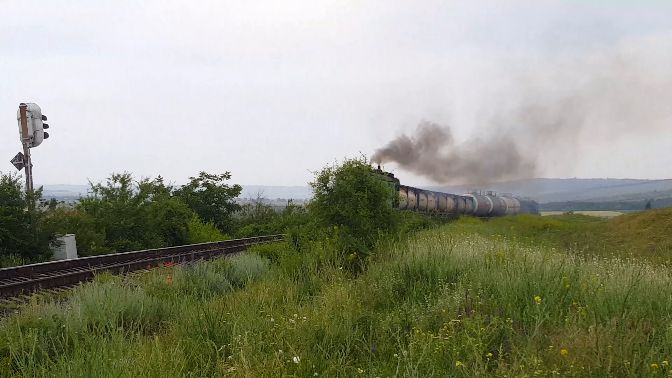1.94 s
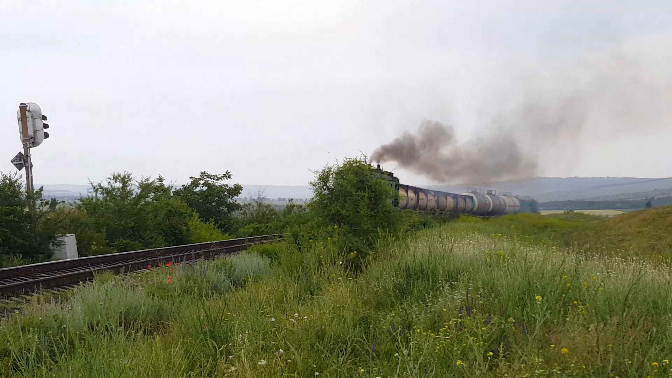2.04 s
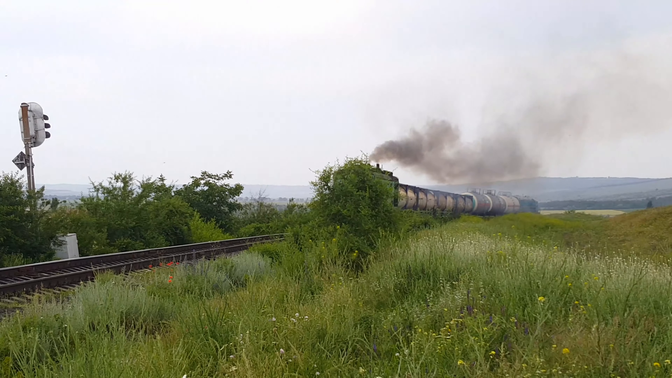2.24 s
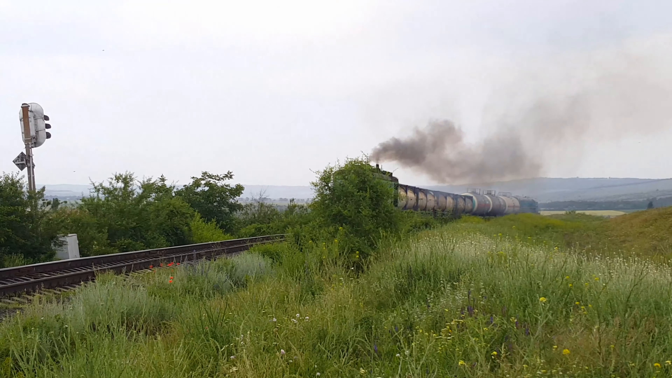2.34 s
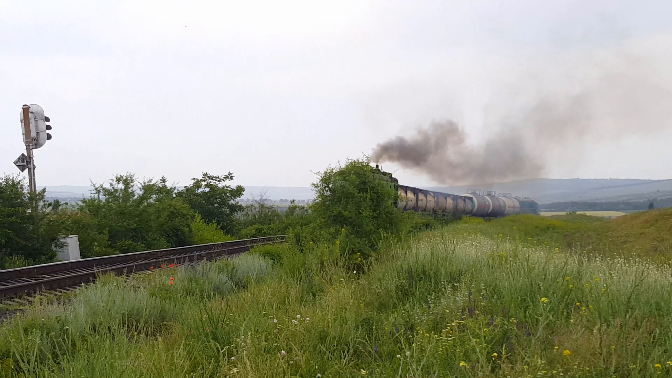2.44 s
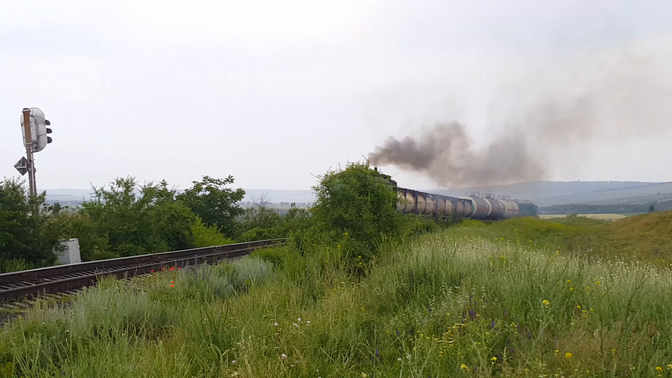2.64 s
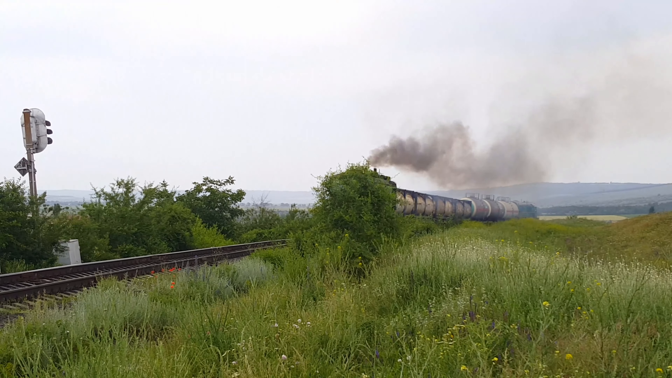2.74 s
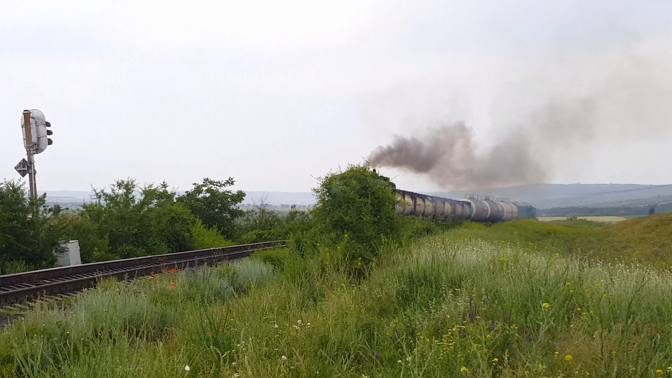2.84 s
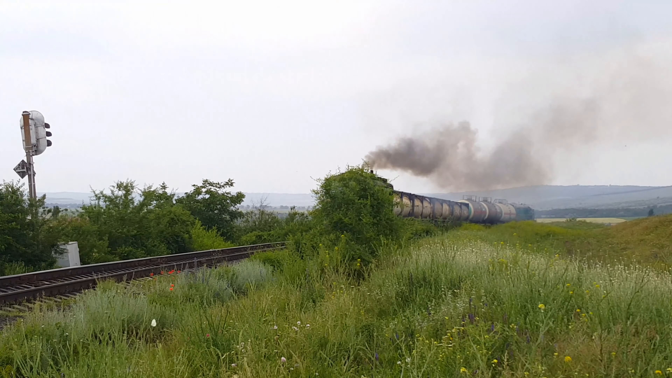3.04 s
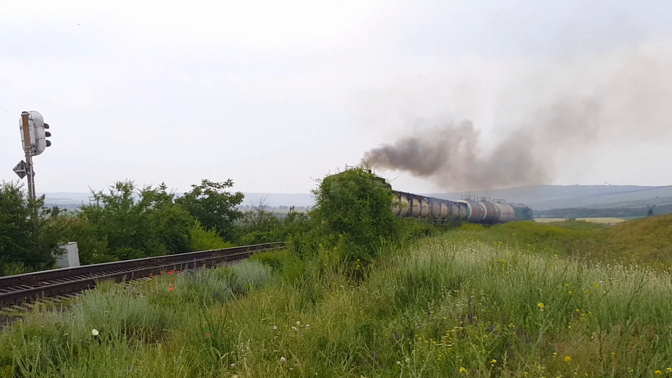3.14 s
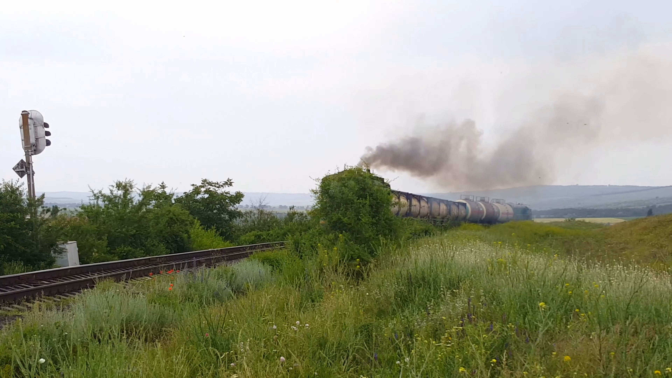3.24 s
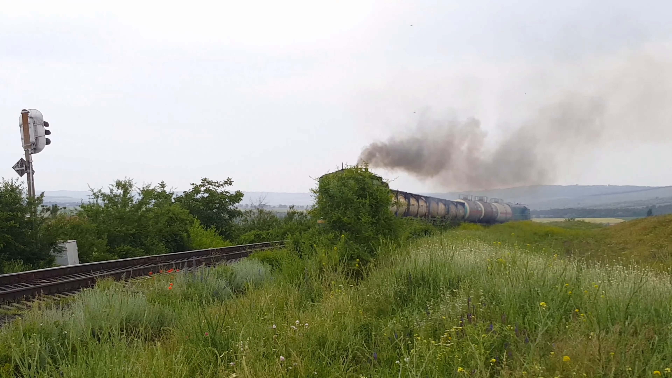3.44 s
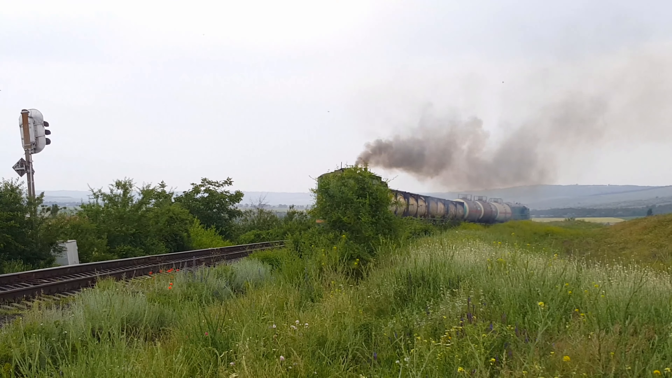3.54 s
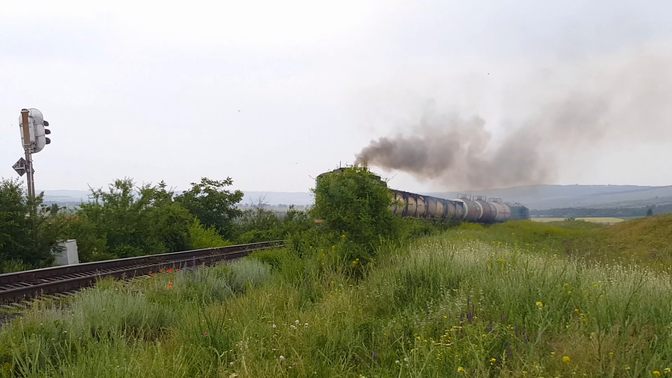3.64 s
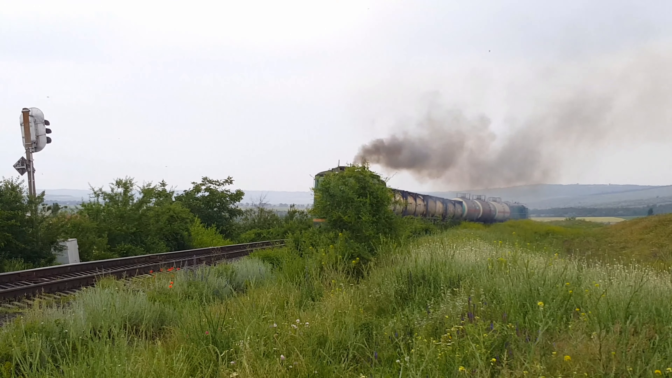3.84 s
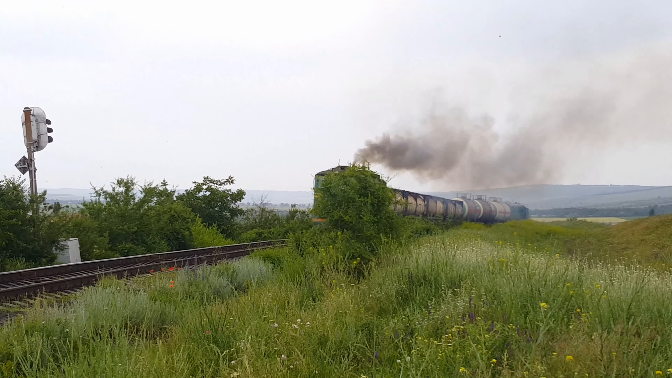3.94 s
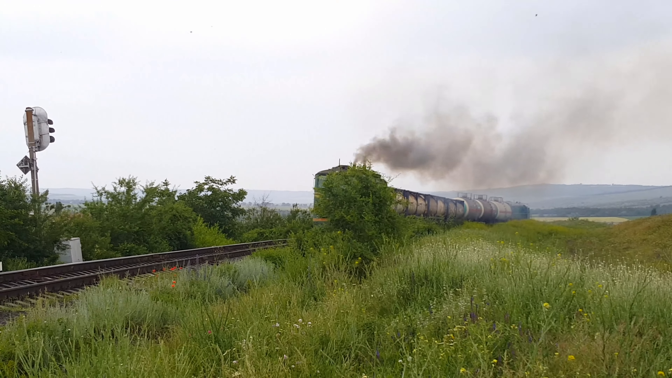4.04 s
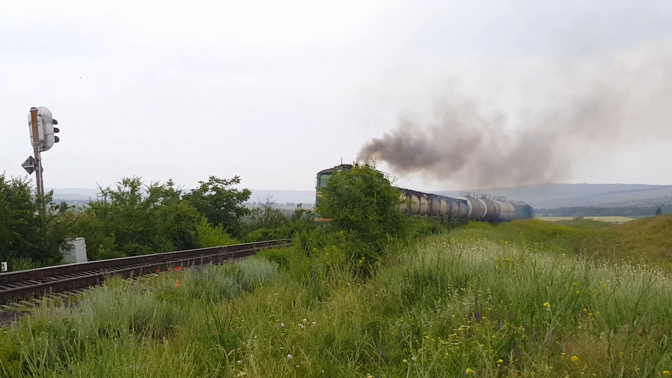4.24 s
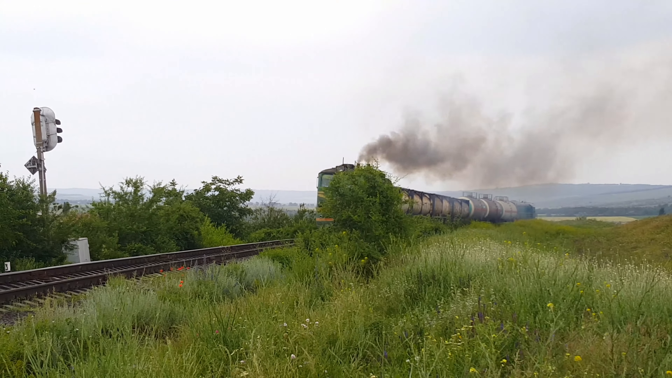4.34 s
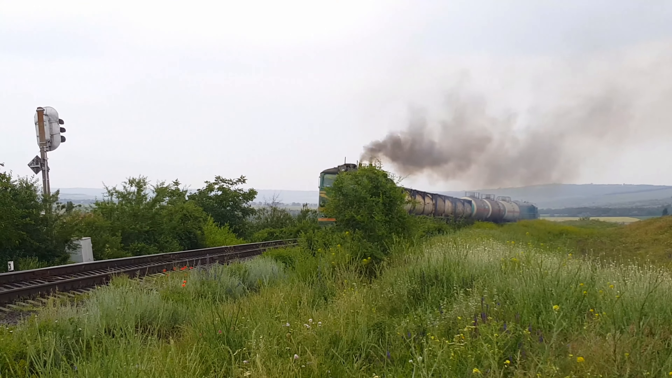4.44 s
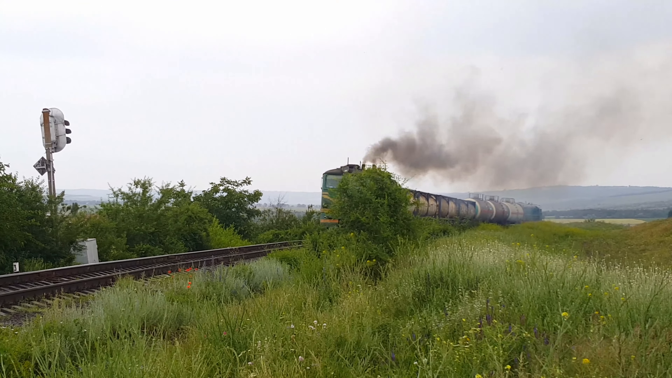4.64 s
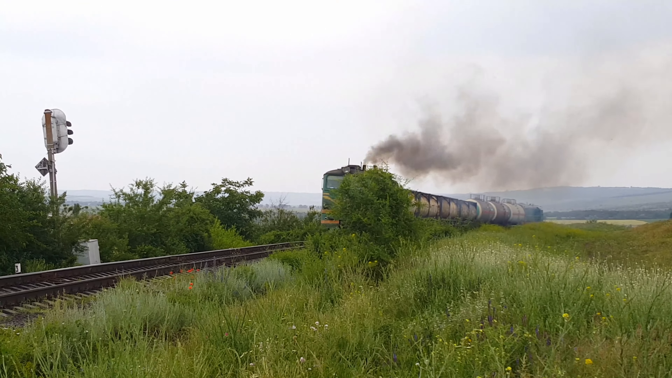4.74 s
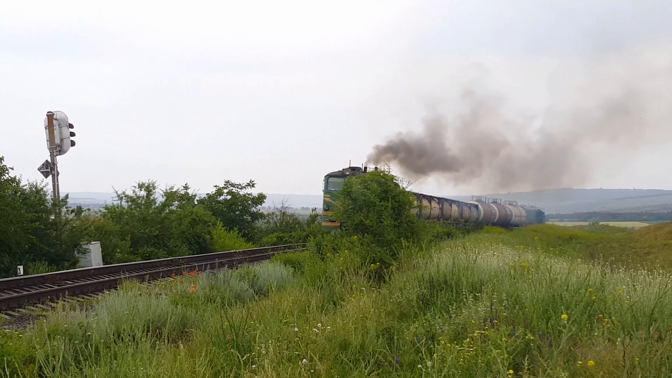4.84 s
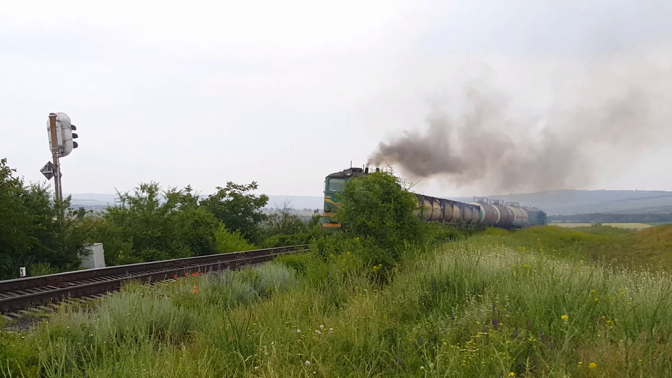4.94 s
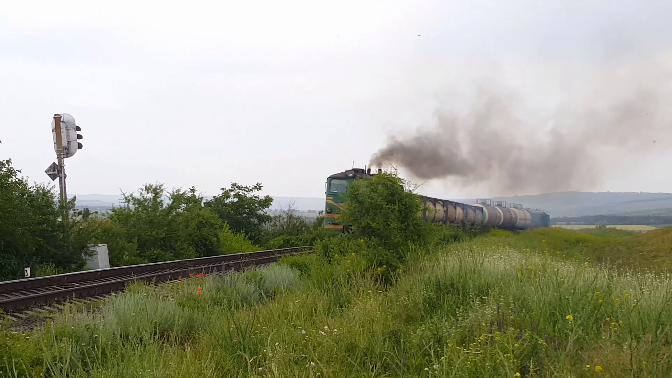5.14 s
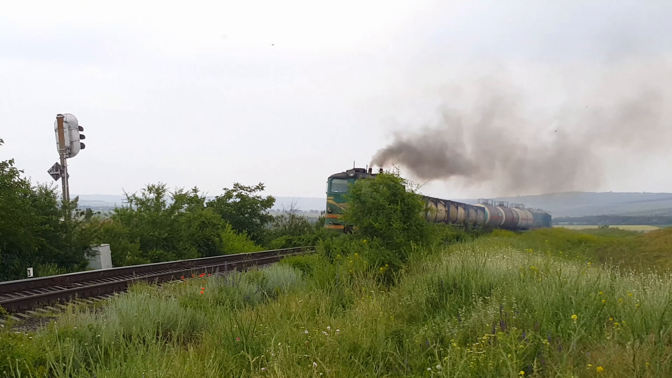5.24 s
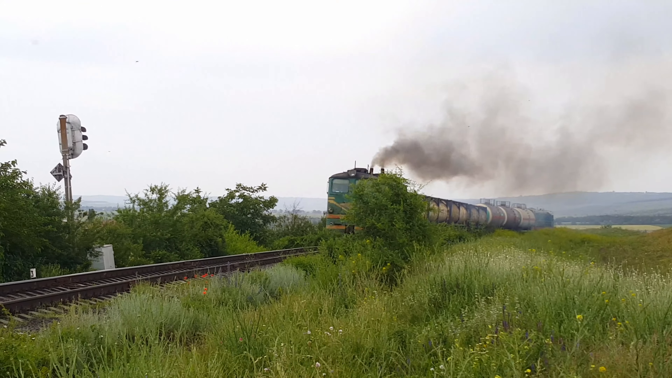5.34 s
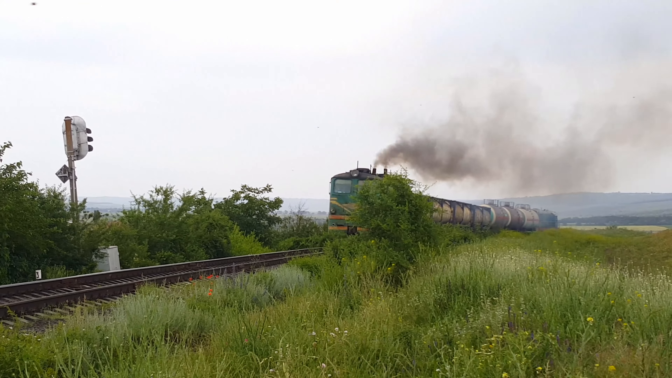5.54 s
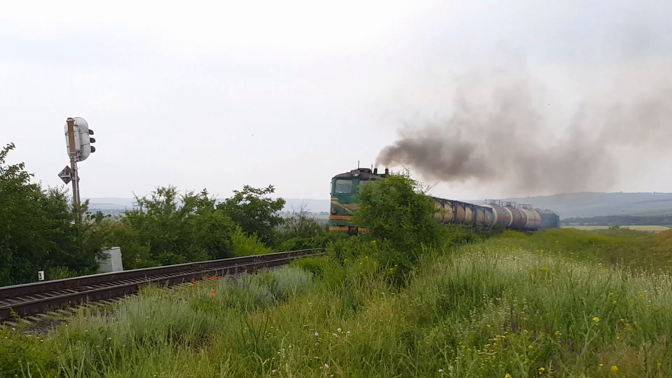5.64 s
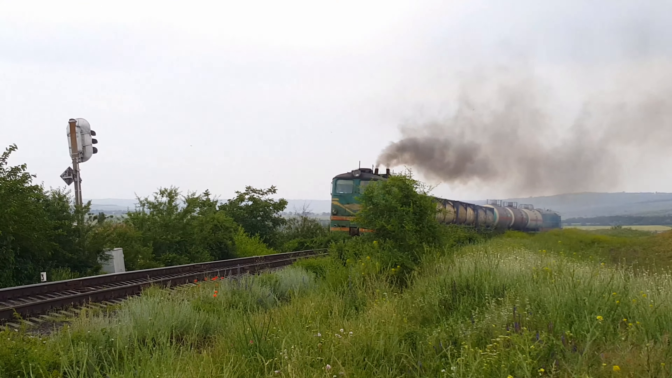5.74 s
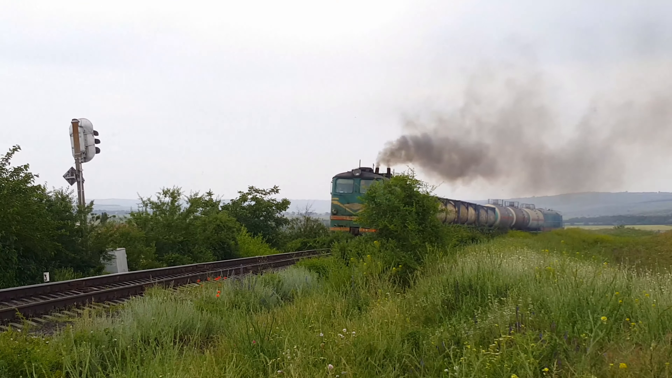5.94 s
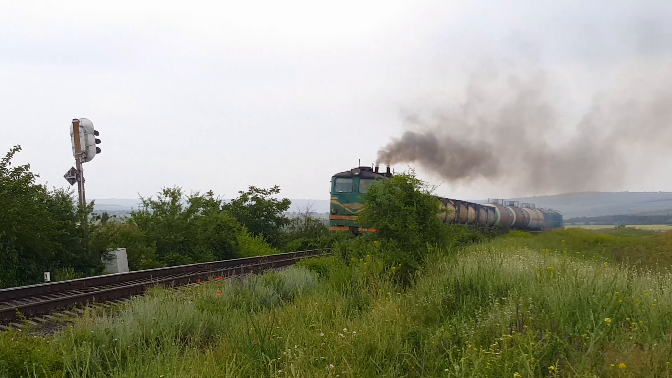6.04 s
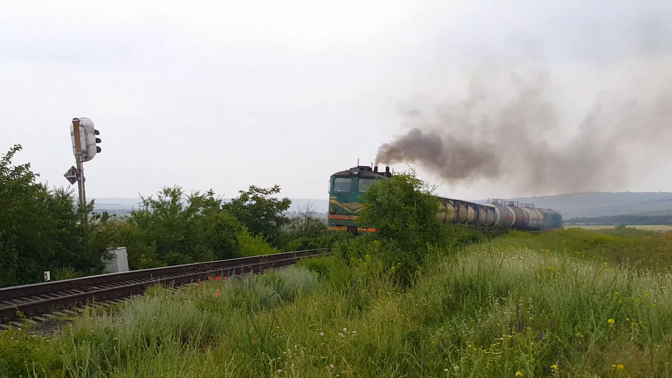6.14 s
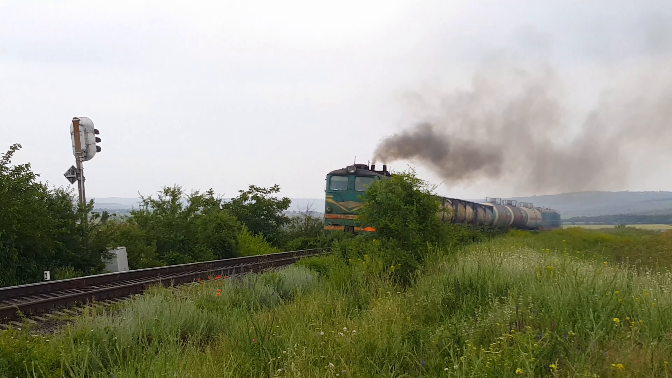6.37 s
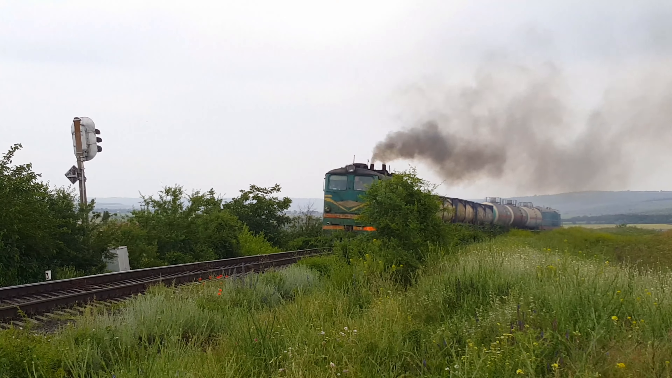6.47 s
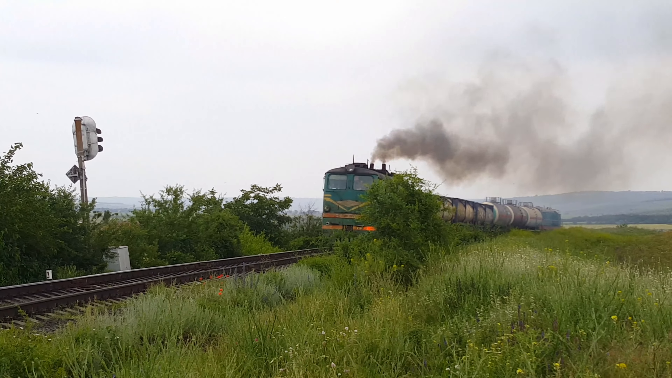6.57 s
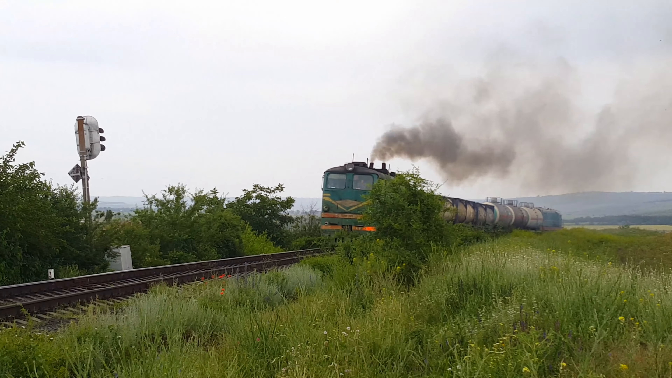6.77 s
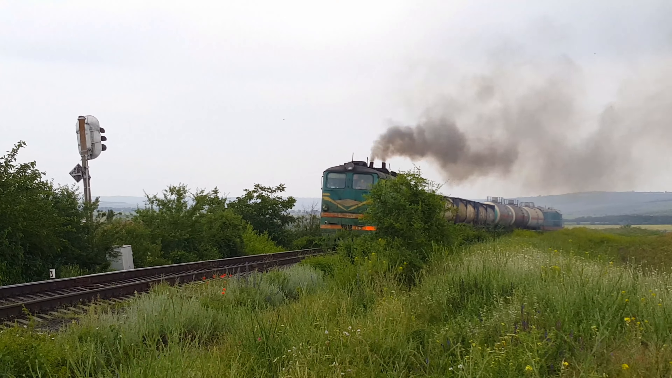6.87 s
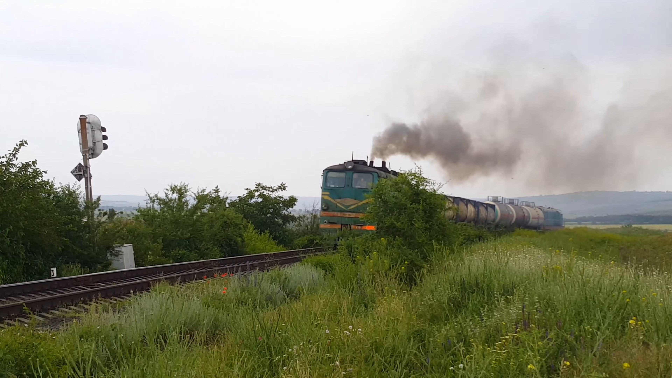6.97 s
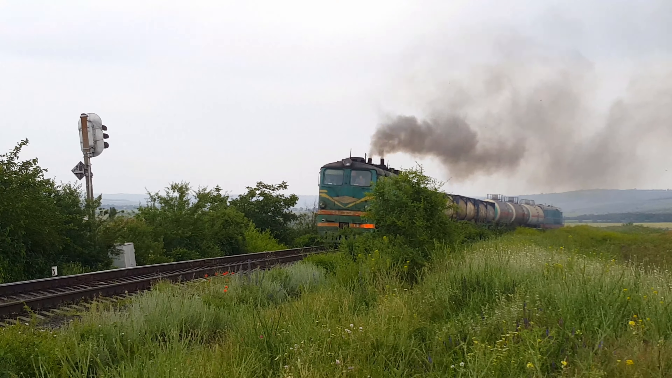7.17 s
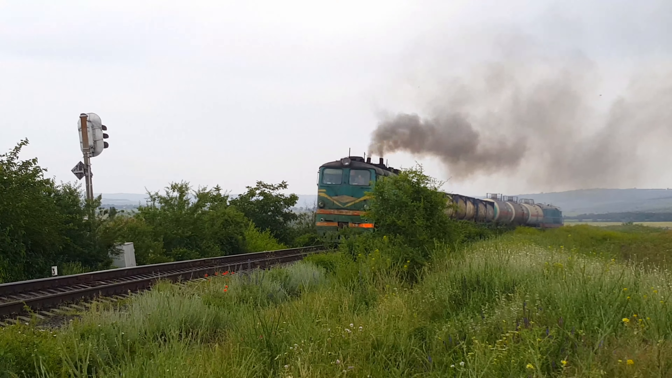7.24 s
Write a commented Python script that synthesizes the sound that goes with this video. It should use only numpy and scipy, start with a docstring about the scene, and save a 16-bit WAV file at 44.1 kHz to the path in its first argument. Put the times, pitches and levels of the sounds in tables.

```python
"""Diesel freight train on a grade

A heavy locomotive hauls tank wagons uphill, slowly nearing across open grassland. Its exhaust throbs
at harmonics of the crank rate and excites the resonances of the stack; the valve gear clatters and the
turbocharger whistles. Wheels rumble round a curve, where friction between flange and rail makes them
grind and squeal in bouts. Insects hiss faintly in the grass."""
import sys
import numpy as np
from scipy import signal
from scipy.fft import rfft, irfft, next_fast_len
from scipy.io import wavfile

SR = 44100
rng = np.random.default_rng(int(sys.argv[2]) if len(sys.argv) > 2 else 0)


def wav_record(signal):
    """Record a signal, one row per channel, as 16-bit PCM in the file named by sys.argv[1]."""
    frames = np.transpose(np.atleast_2d(signal))
    bounded = np.clip(frames, -1, 1)
    # unit amplitude maps onto the largest positive 16-bit level
    quanta = np.round(bounded * 32767).astype(np.int16)
    wavfile.write(sys.argv[1], SR, quanta)


N = 362061
T = np.arange(N) / SR


def gain_of(db):
    """Amplitude ratio of a level in decibels."""
    return 10 ** (np.asarray(db) / 20)


def unit_rms(x):
    """Normalisation to an rms of 1."""
    return x / np.sqrt(np.mean(x ** 2) + 1e-20)


def follow(curve):
    """Linear interpolation of a (time, value) table at every sample."""
    return np.interp(T, *np.transpose(curve))


def at_hz(spectrum, hz):
    """Interpolation of a (frequency, value) table on a logarithmic frequency axis."""
    freqs, values = np.transpose(spectrum)
    return np.interp(np.log(hz + 1), np.log(freqs + 1), values)


def drift(top_hz):
    """Slow random fluctuation of rms 1: sinusoids of random phase over three octaves."""
    times = np.linspace(0, T[-1], 4000)
    rates, phases = np.geomspace(top_hz / 8, top_hz, 30), rng.random(30)
    waves = np.sin(2 * np.pi * (np.outer(times, rates) + phases))
    return unit_rms(np.interp(T, times, waves @ rates ** -.5))


def filtered(x, response):
    """Linear filtering: the spectrum is multiplied by a frequency response."""
    size = next_fast_len(N + 8192)
    return irfft(rfft(x, size) * response(np.fft.rfftfreq(size, 1 / SR)), size)[..., :N]


def resonate(x, modes):
    """Modal superposition: each (frequency, width, gain) mode is two like resonators in cascade."""
    return filtered(x, lambda hz: sum(gain_of(db) / (1 + 2j * (hz - centre) / width) ** 2
                                      for centre, width, db in modes))


def unit_in_band(x, low_hz, high_hz):
    """Normalisation so that the mean of the channels has an rms of 1 within a band."""
    mono = np.atleast_2d(x).mean(0)
    return x / np.std(filtered(mono, lambda hz: (hz > low_hz) & (hz < high_hz)))


# Likeness of the sound field at left and right: (frequency [Hz], coherence [0-1])
COHERENCE = [(60, 1), (120, 0.96), (240, 0.97), (480, 0.99), (950, 0.73), (1890, 0.84), (3770, 0.69),
             (7520, 0.43), (15000, 0.08)]

def white_pair():
    """Partial coherence: white noise in two channels, less alike towards the treble."""
    mid, side = rng.standard_normal((2, N))
    mid = filtered(mid, lambda hz: np.sqrt(1 + at_hz(COHERENCE, hz)))
    side = filtered(side, lambda hz: np.sqrt(1 - at_hz(COHERENCE, hz)))
    return np.array([mid + side, mid - side])


def noise(spectrum):
    """Spectral shaping of two-channel white noise."""
    return filtered(white_pair(), lambda hz: gain_of(at_hz(spectrum, hz)))


def whine(pitch_hz, level_db, wander_hz, flutter_db):
    """Random modulation: moving air on the path makes a pure tone waver in pitch and level."""
    phase = 2 * np.pi * np.cumsum(pitch_hz + wander_hz * drift(40)) / SR
    return np.sqrt(2) * np.sin(phase) * gain_of(level_db + flutter_db * drift(15))


def nearness(power=1, start_m=131.6, approach_m_per_s=7.68):
    """Inverse-distance law, raised to a power: the gain of the nearing train, 1 at the start."""
    return (start_m / (start_m - approach_m_per_s * T)) ** power


def fan(crank_hz, order=49):
    """Rotational tone: the fan whines at a fixed multiple of the crank rate."""
    return whine(order * crank_hz, level_db=-44.5, wander_hz=.49, flutter_db=-.4) * nearness(power=.75)


# Harmonics of the exhaust: (order [multiple of the crank rate], relative level [dB])
EXHAUST_ORDERS = [(5, -47), (6, -39), (7, -18), (8, -36), (9, -29), (10, -25), (11, -40), (12, -30),
                  (13, -18), (14, -32), (15, -36), (16, -26), (17, -33), (18, -35), (19, -40), (20, -39),
                  (21, -46), (22, -43), (23, -51), (24, -32), (25, -37), (26, -40), (27, -40), (28, -38),
                  (29, -40), (30, -60), (31, -52), (32, -47), (33, -49), (34, -55)]
# Strength of the upper orders together: (time [s], level [dB])
BARK_LEVEL = [(0.5, -27.5), (2.6, -30), (5.5, -28.3), (8.21, -26.5)]

def exhaust(turns, boom_db=-16.5, shudder_db=.5, first_bark_order=22):
    """Dispersion: the pipe delays each order differently, smearing each blast into a boom and a bark."""
    boom_pipe, bark_pipe = (.656, -.024, .014), (.719, -.112, 0)  # delay, quadratic, cubic phase terms
    wavering_turns = turns + .0006 * drift(6)  # unsteady gas flow
    boom, bark = np.zeros((2, N))
    for order, db in EXHAUST_ORDERS:
        layer, (delay, quadratic, cubic) = (boom, boom_pipe) if order < first_bark_order else (bark, bark_pipe)
        offset = order - 13
        cycles = order * (wavering_turns - delay) + quadratic * offset ** 2 + cubic * offset ** 3
        layer += gain_of(db + .45 * drift(5)) * np.cos(2 * np.pi * cycles)
    boom_gain = gain_of(boom_db + shudder_db * drift(12)) * nearness()
    return boom_gain * unit_rms(boom) + gain_of(follow(BARK_LEVEL)) * unit_rms(bark)


# Turbulent exhaust gas: (frequency [Hz], relative spectral density [dB])
GAS_SPECTRUM = [(20, -23), (35, -11.5), (55, 11.5), (80, 3.5), (120, 8.5), (170, 1), (250, -1.5),
                (350, -13.5), (600, -51)]

def exhaust_gas(level_db=-32):
    """Turbulence: the outflow makes a low rumble that grows as the engine nears."""
    return gain_of(level_db) * nearness() * unit_rms(noise(GAS_SPECTRUM))


# Hardest exhaust blows of each crank turn: (position [turns], relative level [dB])
BLOWS = [(.27, -1), (.385, -11), (.6, -14), (.79, -12), (.95, 0)]
# Resonances of the stack: (frequency [Hz], width [Hz], gain [dB])
STACK_MODES = [(955, 75, 0), (900, 110, -6)]
# Bands of the gas rasp after each blow: (frequency [Hz], width [Hz], gain [dB])
RASP_BANDS = [(760, 250, 0.5), (1828, 210, -4)]
# Strength of the stack's ringing: (time [s], level [dB])
KNOCK_LEVEL = [(0, -38.5), (4, -39), (6.3, -36), (7.2, -42), (8.21, -41)]

def stack(turns, rasp_db=-48.5, rasp_decay_s=.024):
    """Impulse response: exhaust blows ring the stack in a double knock, each with a decaying rasp."""
    blows = np.zeros(N)
    for position, db in BLOWS:
        blows[1:] += gain_of(db) * np.diff(np.floor(turns - position))
    blows *= gain_of(.8 * drift(20))
    puffs = resonate(blows, [(935, 190, 0)])  # soft-edged puffs give round knocks
    knock = gain_of(follow(KNOCK_LEVEL)) * unit_rms(resonate(puffs, STACK_MODES))
    flow = signal.lfilter([1], [1, -np.exp(-1 / (SR * rasp_decay_s))], blows)
    rasp = resonate(flow * rng.standard_normal(N), RASP_BANDS)
    return knock + gain_of(rasp_db) * nearness(power=1.6) * unit_rms(rasp)


def throb(turns, depth):
    """Amplitude modulation at the exhaust's strong beat, seven to a crank turn."""
    return 1 + depth * np.cos(2 * np.pi * 7 * turns)


# Resonances of the engine casing: (frequency [Hz], width [Hz], gain [dB])
CASING_MODES = [(369.4, 24, -5.5), (423, 39, -12.5), (497, 135, -7), (654, 36, 0.5), (755, 21, 4.5),
                (1210, 180, -11)]
# Strength of both the valve rattle and the rolling roar: (time [s], relative level [dB])
ROAR_LEVEL = [(0.3, -38.5), (3, -36), (8.21, -34)]

def valve_gear(turns, level_db=-4, points_per_turn=4096):
    """Forced vibration: a dense rattle, repeating with every crank turn, drives the casing's modes."""
    one_turn = rng.standard_normal(points_per_turn)
    rattle = np.interp(turns % 1, np.arange(points_per_turn) / points_per_turn, one_turn)
    rattle *= throb(turns, depth=.2)
    return gain_of(follow(ROAR_LEVEL) + level_db) * unit_rms(resonate(rattle, CASING_MODES))


# Pitch of the turbocharger's main whistle: (time [s], frequency [Hz])
TURBO_PITCH = [(0, 2059), (2.5, 2060), (4.5, 2066), (6.5, 2073), (8.21, 2072)]
# Strength of its main and high tones: (time [s], relative level [dB])
WHISTLE_LEVEL = [(0, -53), (.7, -46.5), (1.1, -53), (2, -43), (2.8, -53), (5, -45), (5.4, -51.5), (7, -44),
                 (8.21, -51.5)]
# Strength of its low tone: (time [s], relative level [dB])
LOW_WHINE_LEVEL = [(0, -63), (1.2, -50), (2.5, -38), (3.75, -41.5), (5.3, -53.5), (6.4, -41), (8.21, -56)]

def turbocharger():
    """Inharmonic partials: three tones in fixed frequency ratios rise slightly together."""
    pitch, whistle_db = follow(TURBO_PITCH), follow(WHISTLE_LEVEL)
    main = whine(pitch, whistle_db - 1, wander_hz=1.5, flutter_db=1.5)
    low = whine(.877 * pitch, follow(LOW_WHINE_LEVEL) - 8, wander_hz=5, flutter_db=3)
    high = whine(1.503 * pitch, whistle_db - 10, wander_hz=2.8, flutter_db=3)
    return main + low + high


# Insects in the grass: (frequency [Hz], relative spectral density [dB])
INSECT_SPECTRUM = [(8000, -23.5), (13800, -22), (14250, -10), (14550, 4), (14800, 8.5), (15150, -2.5),
                   (15700, -5.5)]

def insects(level_db=-65):
    """Narrow-band noise: a faint, high hiss whose level flickers slightly."""
    return gain_of(level_db) * unit_rms(noise(INSECT_SPECTRUM)) * gain_of(.4 * drift(25))


def swell(start, rise, hold, fall):
    """Trapezoidal envelope from 0 to 1 and back, with times in seconds."""
    return np.interp(T, start + np.cumsum([0, rise, hold, fall]), [0, 1, 1, 0])


# Wheel squeals: (start [s], rise [s], hold [s], fall [s], frequency [Hz], relative level [dB])
SQUEALS = [(-.1, .1, 1.0, 0.14, 4730, -53.5), (1.153, .27, 0.47, .3, 4740, -49),
           (2.8, .8, 2.2, .04, 4772, -50), (4.15, 0.19, .12, 0.28, 4772, -46),
           (6.45, 0.32, .15, .45, 4700, -45), (6.8, .4, .15, .3, 4970, -45.5),
           (7.4, 0.36, 0.27, 0.33, 5110, -48)]

def squeals(tone_db=-5, rush_db=-3, rush_width_hz=350, rush_below_hz=50):
    """Friction-excited vibration: a slipping wheel sings one wavering tone inside a narrow rush."""
    friction, sound = white_pair(), np.zeros((2, N))
    for *timing, hz, db in SQUEALS:
        tone = whine(hz, tone_db, wander_hz=14, flutter_db=2.5)
        rush = unit_rms(resonate(friction, [(hz - rush_below_hz, rush_width_hz, 0)]))
        sound += gain_of(db) * swell(*timing) * (tone + gain_of(rush_db) * rush)
    return sound


# Wheels rolling on the rails: (frequency [Hz], relative spectral density [dB])
ROLLING_SPECTRUM = [(200, -3), (330, -1), (430, -0.5), (660, 3.5), (800, 1), (940, 4.5), (1150, -4),
                    (1500, -7.5), (2500, -23), (6000, -63.5)]

def rolling(turns, level_db=-1.5, waver_db=.75):
    """Rolling noise: the broadband roar of the train, modulated by the beat of the exhaust."""
    roar = unit_in_band(noise(ROLLING_SPECTRUM), 500, 860)
    gain = gain_of(follow(ROAR_LEVEL) + level_db + waver_db * drift(14))
    return roar * throb(turns, depth=.08) * gain


# Bouts of a flange pressing on the curved rail:
# (start [s], rise [s], hold [s], fall [s], relative grind level [dB], relative scrape level [dB])
FLANGE_BOUTS = [(0.713, 0.39, 0.96, 0.26, -47.5, -73), (1.104, .2, .22, 0.11, -42.5, -56),
                (1.565, 0.11, 0.16, 0.05, -41.5, -55), (2.45, 0.19, .25, .1, -46.5, -61.5),
                (2.87, 0.21, .08, .22, -40.5, -55.5), (3.14, 0.26, 0.11, 0.19, -42, -54),
                (3.595, 0.12, 0.12, 0.19, -45, -73), (3.992, 0.48, 0.23, .55, -43.5, -53.5),
                (5.58, .13, 0.21, 0.18, -44, -48), (6.349, 0.13, 0.33, 1.6, -41.5, -48.5),
                (6.55, .8, 0.49, 1.9, -53, -49), (7.918, .1, 0.14, .1, -44, -55.5)]

def flange_contact(light_grind_db=-47, light_scrape_db=-64):
    """Incoherent addition: light rubbing and bouts sum in power to give grind and scrape envelopes."""
    grind_power = (gain_of(light_grind_db) * nearness(power=.5)) ** 2
    scrape_power = (gain_of(light_scrape_db) * nearness(power=1.7)) ** 2
    for *timing, grind_db, scrape_db in FLANGE_BOUTS:
        grind_power += (gain_of(grind_db) * swell(*timing)) ** 2
        scrape_power += (gain_of(scrape_db) * swell(*timing)) ** 2
    return np.sqrt(grind_power), np.sqrt(scrape_power)


# Short bites of a flange: (time [s], relative level [dB], half-width [s])
FLANGE_BITES = [(2.647, -57.5, .035), (3.966, -56, 0.054), (5.275, -62, .035)]
# Resonances of the wheel discs and of the rims: (frequency [Hz], width [Hz], gain [dB])
DISC_MODES = [(1844, 340, 2.5), (1934, 100, -21), (1208, 340, 0)]
RIM_MODES = [(5240, 130, -0.5), (5944, 170, -2), (6970, 150, -4), (7280, 100, -6), (7730, 280, -7),
             (8450, 180, -14.5)]
# Strength of the discs' ringing: (time [s], relative level [dB])
DISC_LEVEL = [(0.3, -49), (1.2, -38), (2.3, -43), (3.2, -40), (4.2, -41), (5.4, -46.5), (6.3, -40),
              (8.21, -41)]
# Three bands of friction noise, low to high: (frequency [Hz], relative spectral density [dB])
GRIND_SPECTRUM = [(900, -14.5), (1500, 2), (2000, -1), (2150, -3), (2400, 3.5), (2900, 3), (3300, 0),
                  (3850, 1), (4200, -7.5), (4450, -3.5), (5000, -7.5), (6200, -20.5), (12000, -50.5)]
SCRAPE_SPECTRUM = [(2000, -11), (3600, 6.5), (4250, -1), (5200, 4), (6450, -1.5), (7500, -0.5), (8650, 0.5),
                   (9400, -10), (11000, -29), (15500, -33.5)]
FIZZ_SPECTRUM = [(6000, -23), (9500, 3.5), (12000, 1.5), (15500, -4)]

def wheels(turns, disc_db=-1.4, grind_db=1, scrape_db=-2, rim_db=-6, fizz_db=-5.5, bite_fizz_db=-10):
    """Sliding friction: flanges grind and ring the discs; hard contact adds a bright, singing scrape."""
    pressure, contact = flange_contact()
    bites = sum(gain_of(db) * np.exp(-((T - time) / width) ** 2) for time, db, width in FLANGE_BITES)
    contact = np.hypot(contact, bites)
    discs = unit_in_band(resonate(white_pair(), DISC_MODES), 1650, 2000)
    grind = unit_in_band(noise(GRIND_SPECTRUM), 2300, 4000)
    scrape = unit_in_band(noise(SCRAPE_SPECTRUM), 6500, 9000)
    friction = white_pair()
    rims = sum(resonate(friction, [mode]) * gain_of(2 * drift(5)) for mode in RIM_MODES)
    rims = unit_in_band(rims, 6500, 9000)
    fizz = unit_rms(noise(FIZZ_SPECTRUM))
    hard_contact = contact.max() * (contact / contact.max()) ** 1.8  # fizz grows faster than the rest
    rub = discs * gain_of(follow(DISC_LEVEL) + disc_db)
    rub += grind * pressure * gain_of(grind_db)
    rub += contact * (scrape * gain_of(scrape_db) + rims * gain_of(rim_db))
    rub += fizz * (hard_contact * gain_of(fizz_db) + bites * gain_of(bite_fizz_db))
    return rub * throb(turns, depth=.11) * gain_of(.76 * drift(35))


# Rotation of the crankshaft: (time [s], rate [turns/s])
CRANK_RATE = [(0, 9.43), (1.5, 9.472), (3, 9.509), (4.6, 9.529), (6, 9.53), (8.21, 9.539)]

def scene():
    """Superposition: the engine, timed by its crankshaft, adds to the insects and the wheels."""
    crank_hz = follow(CRANK_RATE)
    turns = np.cumsum(crank_hz) / SR
    engine = fan(crank_hz) + exhaust(turns) + exhaust_gas() + stack(turns) + valve_gear(turns)
    return engine + turbocharger() + insects() + squeals() + rolling(turns) + wheels(turns)


# Level of left over right: (frequency [Hz], level difference [dB])
LEVEL_DIFFERENCE = [(60, 0.5), (110, 1.5), (200, -0.5), (380, 1.5), (700, 1.5), (1290, 1), (2380, 4),
                    (4400, -1.5), (8120, 1), (15000, 3.5)]
# Phase of left ahead of right: (frequency [Hz], phase difference [rad])
PHASE_DIFFERENCE = [(0, 0.21), (1120, -0.14), (1380, -0.53), (2500, -0.17), (3450, -0.61), (5510, 0.27),
                    (9910, 0.29), (15200, 0.5)]

def record(dry, cutoff_hz=15720):
    """Stereo cues: two microphone ports differ in level and phase; a low-pass limits the band."""
    half = np.array([[.5], [-.5]])  # each channel takes half of the difference
    pair = filtered(dry, lambda hz: gain_of(half * at_hz(LEVEL_DIFFERENCE, hz))
                    * np.exp(1j * half * at_hz(PHASE_DIFFERENCE, hz)))
    low_pass = signal.firwin(511, cutoff_hz, window=("kaiser", 9), fs=SR)
    return signal.oaconvolve(pair, low_pass[None], "same")


dry = scene()
out = record(dry)
wav_record(out)
```